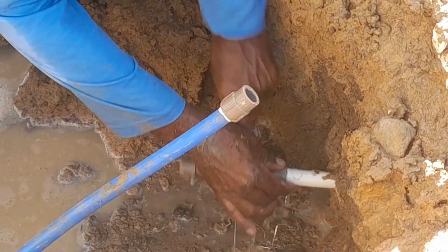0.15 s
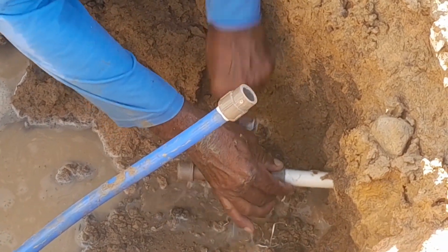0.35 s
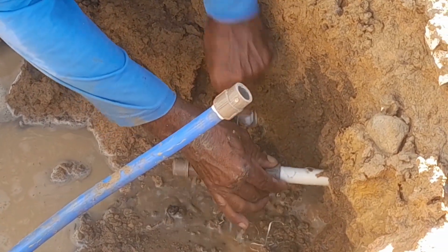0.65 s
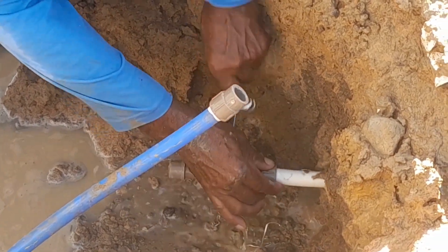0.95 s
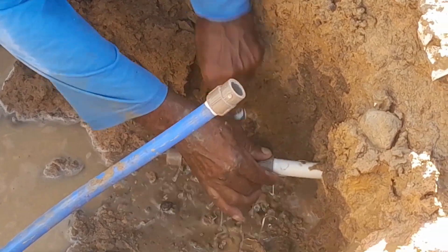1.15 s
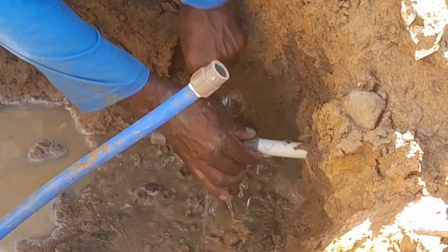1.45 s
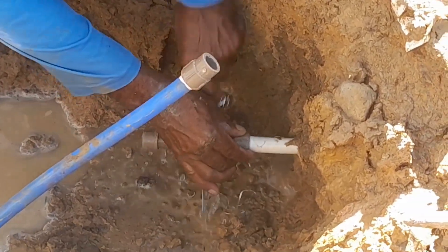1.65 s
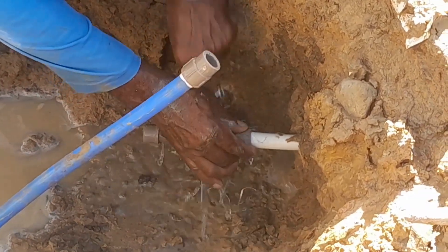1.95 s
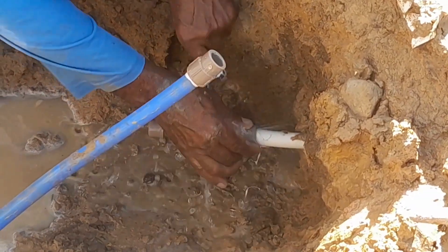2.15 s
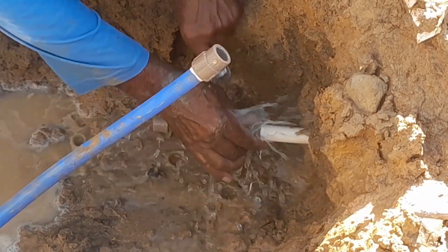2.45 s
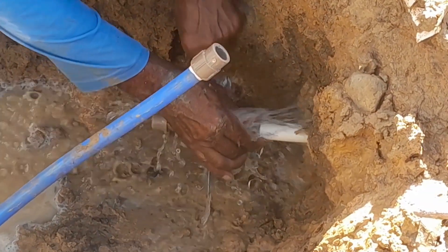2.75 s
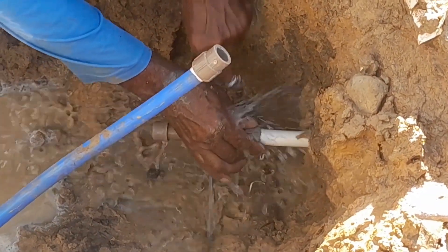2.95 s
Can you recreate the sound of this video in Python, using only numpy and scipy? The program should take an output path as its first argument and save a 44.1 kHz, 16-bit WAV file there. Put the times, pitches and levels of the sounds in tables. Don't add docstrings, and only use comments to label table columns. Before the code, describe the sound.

A hand saw rasps to and fro on a plastic pipe, close up in a muddy hole, a stroke every 0.16 seconds, with hollow ringing, gritty snags and knocks. It is strongest around 0.4-1.5 s, then softer, nearly gone by 2.9 s. Wind rumbles and pops on the left from 0.4 to 1.7 s, with brief puffs on the right. From about 1.9 s water hisses, spitting and growing after 2.3 s.

```python
import sys
import numpy as np
from scipy import signal
from scipy.fft import rfft, irfft
from scipy.io import wavfile
from scipy.ndimage import uniform_filter1d

SR = 44100
rng = np.random.default_rng(int(sys.argv[2]) if len(sys.argv) > 2 else 0)


def volts_from_decibels(level):
    exponent = np.asarray(level, float) / 20
    return 10 ** exponent


def wav_out(sig):
    wavfile.write(sys.argv[1], SR, np.round(np.clip(np.atleast_2d(sig).T, -1, 1) * 32767).astype(np.int16))


N = 136710
T = np.arange(N) / SR

# [Hz, dB]
LEFT_SHADE = [(300, 2.5), (700, -3.5), (1290, -3.5), (2380, -2), (4400, -1.5), (8120, -1.5), (12000, -0.5),
              (15000, -3)]


def unit(x):
    return x / np.sqrt(np.mean(x ** 2))


def noise():
    return rng.standard_normal(N)


def ring(x, hz, width_hz):
    b, a = signal.iirpeak(min(hz, .45 * SR), hz / max(width_hz, 5), SR)
    return signal.lfilter(b, a, x)


def colour(x, points, turn=((0, 0), (1, 0))):
    point_hz, point_db = np.array(points).T
    turn_hz, turn_rad = np.array(turn).T
    f = np.maximum(np.fft.rfftfreq(N, 1 / SR), 1)
    gain = volts_from_decibels(np.interp(np.log(f), np.log(point_hz), point_db, left=-70))
    return irfft(rfft(x) * gain * np.exp(1j * np.interp(f, turn_hz, turn_rad)), N)


def walk(rate):
    k = int(SR / rate)
    held = np.repeat(rng.standard_normal(N)[:N // k + 1], k)
    slewed = uniform_filter1d(uniform_filter1d(held, k), k)
    return unit(slewed[:N])


def curve(rows):
    return volts_from_decibels(np.interp(T, *np.array(rows).T))


def stroke(start, length, arch=0.44, fade_db=-3):
    bite_s, let_go_s = .002, .011
    travel = np.clip((T - start) / length, 0, 1)
    bite = np.clip((T - start) / bite_s, 0, 1)
    shape = bite * (1 - arch + arch * np.sin(np.pi * travel)) * volts_from_decibels(fade_db * travel)
    return shape * np.exp(-np.clip((T - start - length) / let_go_s, 0, 50))


def body(x, e, modes):
    patchy_db = 1.8
    steady_and_played = np.array([x, x * e])
    out = 0
    for k, (hz, width_hz, db) in enumerate(modes):
        swell = volts_from_decibels(db + patchy_db * walk(45.07))
        out = out + (-1) ** k * swell * ring(steady_and_played, hz, width_hz) / np.sqrt(width_hz)
    return out[1] / out[0].std()


def saw():
    # [s, s, dB, dB, Hz]
    pulls = [
        (-.01, 0.075, -40, -38, 479.7),
        (.318, 0.074, -28, -37, 481.1),
        (0.64, 0.052, -28, -36.5, 520),
        (0.964, 0.072, -29, -34.5, 481),
        (1.287, 0.051, -24.5, -32, 569.4),
        (1.612, 0.073, -38, -39, 560),
        (1.914, 0.055, -26, -41.5, 542.7),
        (2.253, 0.048, -37.5, -42, 520),
        (2.572, 0.067, -35.5, -40, 520),
        (2.94, 0.05, -58, -68, 393),
    ]
    # [s, s, dB, dB, dB]
    pushes = [(.03, 0.029, -55, -43, -42), (2.947, 0.046, -63, -66, -45), (0.168, 0.068, -34.5, -34, -47.5),
              (0.508, 0.035, -25, -28, -40.5), (0.837, 0.065, -31, -29.5, -41.5),
              (1.144, 0.064, -31.5, -28, -32.5), (1.458, 0.046, -27, -27, -39.5),
              (1.513, 0.021, -27, -28, -34), (1.779, 0.086, -33, -38, -39.5),
              (2.091, 0.031, -45.5, -41, -45), (2.117, 0.055, -34.5, -39, -39),
              (2.419, 0.091, -38.5, -41.5, -39.5), (2.745, 0.081, -35, -41.5, -35)]
    # [s, dB, dB, s]
    snags = [(0.09, -49.5, -35, 0.012), (.224, -39, -34.5, 0.019), (0.406, -40, -31, 0.01),
             (0.488, -26, -43, 0.0071), (0.559, -30.5, -30, 0.022), (0.581, -49, -64, 0.061),
             (0.71, -42.5, -33.5, 0.024), (0.811, -26.5, -31.5, 0.018), (0.836, -21.5, -26, 0.0092),
             (1.218, -31, -28.5, .016), (1.276, -30, -45, .0085), (1.354, -43, -41, 0.019),
             (1.611, -31, -61, 0.012), (1.771, -45.5, -70, .008), (1.83, -36, -63, 0.028),
             (2.831, -45.5, -47, .031)]
    # [Hz, Hz, dB]
    pipe_modes = [(490, 320, -5.5), (603.5, 26.6, 1.5), (695, 25, -2), (752, 122, -2), (971, 107, 3.5),
                  (1105, 58, 3), (1342, 29, 2.5), (1915, 36, -4.5)]
    # [Hz, Hz, dB per Hz]
    blade_rows = [(2318, 198, -3.5), (2980, 310, -9), (3570, 340, -11), (5460, 1160, -16),
                  (8500, 1020, -13.5), (12200, 10100, -26), (15500, 670, -21.5)]
    tooth_hz, tooth_jitter, tooth_scatter_db, chatter_db = 460, .35, 2.5, 1.2
    pull_gain_hz_per_s, pull_jitter, pull_thud_db = 4000, .075, -17
    thud_hz, thud_width_hz = 388, 283
    grit_share, rasp_apart = .6, .6

    pipe, rasp, thud = np.zeros(N), np.zeros(N), np.zeros(N)
    wobble = walk(500)
    rate = tooth_hz * np.exp(tooth_jitter * wobble)
    for start, length, pipe_db, rasp_db, thud_db in pushes:
        e = stroke(start, length)
        pipe += volts_from_decibels(pipe_db) * e
        rasp += volts_from_decibels(rasp_db) * e
        thud += volts_from_decibels(thud_db) * e
    for start, length, pipe_db, rasp_db, first_hz in pulls:
        e = stroke(start, length, arch=.6, fade_db=-2)
        pipe += volts_from_decibels(pipe_db) * e
        rasp += volts_from_decibels(rasp_db) * e
        thud += volts_from_decibels(pipe_db + pull_thud_db) * e
        quickening = first_hz + pull_gain_hz_per_s * np.minimum(T - start, length)
        rate = np.where(e > .01, quickening * np.exp(pull_jitter * wobble), rate)
    for start, pipe_db, rasp_db, length in snags:
        e = stroke(start, length) ** 2
        pipe += volts_from_decibels(pipe_db) * e
        rasp += volts_from_decibels(rasp_db) * e

    phase = np.cumsum(rate) / SR
    hits = np.diff(np.floor(phase), prepend=0)
    hits = hits * volts_from_decibels(tooth_scatter_db * noise() + chatter_db * walk(90))
    scrape = (0.46 + np.exp(-(phase % 1) / 0.68)) * volts_from_decibels(2.0 * walk(160))
    teeth = unit(hits - uniform_filter1d(hits, 200)) + grit_share * unit(noise() * scrape)

    steep = signal.butter(2, [350, 1500], "bandpass", fs=SR, output="sos")
    pipe_ring = 1.294 * signal.sosfilt(steep, body(teeth, pipe, pipe_modes))
    mud = thud * unit(ring(ring(teeth, thud_hz, thud_width_hz), thud_hz, thud_width_hz))
    blade_modes = [(hz, w, db + 10 * np.log10(w)) for hz, w, db in blade_rows]

    def blade():
        return body(noise() * scrape, rasp, blade_modes)

    shared = pipe_ring + np.sqrt(1 - rasp_apart) * blade() + mud
    return shared, np.sqrt(rasp_apart) * np.array([blade(), blade()])


def spray():
    # [Hz, dB per Hz]
    spray_colour = [(600, -8.5), (1500, -20), (2300, -8.5), (3300, -8.5), (5500, -7), (9200, -13.5),
                    (14900, -9), (16000, -9)]
    # [Hz, Hz, dB]
    hollow = [(1920, 180, -13.5), (2334, 67, -16.5), (5600, 2700, -36)]
    drops_per_s, drop_db, drop_scatter_db, flicker_db = 2500, -5, 4, 1.8
    landed = rng.random(N) < drops_per_s / SR
    drop_size = volts_from_decibels(drop_scatter_db * np.minimum(rng.exponential(size=N), 4))
    drops = landed * drop_size * np.sign(noise())
    source = noise() + volts_from_decibels(drop_db) * unit(drops)
    jet = 0
    for k, hz in enumerate(700 * 2 ** np.arange(0, 4.7, .3)):
        band = ring(ring(source, hz, hz / 3), hz, hz / 3)
        jet = jet + (-1) ** k * volts_from_decibels(flicker_db * walk(60)) * band
    hiss = unit(colour(jet, spray_colour))
    return unit(hiss + sum(volts_from_decibels(db) * unit(ring(jet, hz, w)) for hz, w, db in hollow))


def water_flow():
    # [s, dB]
    pressure = [(0, -50), (.3, -57), (.6, -52), (.8, -51), (1.1, -54), (1.4, -49), (1.75, -54.5),
                (1.9, -46.5), (2.1, -47.5), (2.3, -40), (2.5, -40.5), (2.54, -41), (2.65, -37),
                (2.9, -37.5), (3.1, -35.5)]
    surge_db = .8
    return curve(pressure) * volts_from_decibels(surge_db * walk(9.15))


def open_air():
    # [Hz, dB per Hz]
    air_colour = [(30, -37), (100, -10.5), (220, -14.5), (510, -5.5), (750, -14.5), (1350, -20.5),
                  (1600, -29), (2500, -49)]
    alike = unit(colour(noise(), air_colour + [(5000, -75)]))
    own = np.array([unit(colour(noise(), air_colour + [(5000, -60)])) for _ in range(2)])
    return volts_from_decibels(-57) * (alike + .5 * own)


def buffet():
    # [Hz, dB per Hz]
    gust_colour = [(15, -32), (25, -16.5), (54, 2), (82, 5.5), (184, -7.5), (246, -13.5), (436, -24.5),
                   (700, -31.5), (910, -45), (1540, -120)]
    buffet_db, buffet_per_s, skew, even_s = 3.5, 40, .16, 0.0525
    x = unit(colour(noise() * volts_from_decibels(buffet_db * walk(buffet_per_s)), gust_colour))
    x = x / np.sqrt(uniform_filter1d(x ** 2, int(even_s * SR)))
    return unit(x - skew * (x ** 2 - 1))


def puffs(rows):
    return sum(volts_from_decibels(db) * np.sin(np.pi * np.clip((T - s) / length, 0, 1)) ** 2 for s, length, db in rows)


def wind():
    # [s, dB]
    left_gust = [(0.25, -65.5), (0.43, -34.5), (0.62, -31.5), (0.78, -26.5), (0.9, -25), (1.06, -25.5),
                 (1.18, -24.5), (1.294, -25), (1.33, -33), (1.42, -24.5), (1.478, -21.5), (1.65, -54),
                 (1.69, -34.5), (1.72, -80)]
    # [s, s, dB]
    left_puffs = [
        (1.84, 0.052, -44),
        (2.14, 0.067, -63),
        (2.35, 0.083, -47.5),
        (2.43, 0.11, -49),
    ]
    # [s, s, dB]
    right_puffs = [(.72, 0.26, -40), (1.0, 0.39, -38), (1.37, 0.069, -31), (1.545, 0.059, -29),
                   (1.615, 0.029, -28.5), (1.665, 0.031, -23), (1.705, 0.042, -45), (1.8, .15, -39.5),
                   (1.96, 0.099, -42), (2.34, 0.091, -43), (2.42, 0.1, -47), (2.7, 0.23, -78)]
    # [s, dB]
    pop_rows = [(0.709, -23), (0.7774, -27), (0.8258, -26), (0.8417, -19.5), (0.8928, -21.5),
                (0.9172, -19.5), (0.9556, -20), (0.975, -16), (1.0008, -19.9), (1.0259, -17.5),
                (1.1067, -19), (1.1298, -24), (1.1755, -18), (1.2099, -17.5), (1.226, -20.5), (1.2508, -21),
                (1.2823, -14.5), (1.3036, -22.5), (1.3688, -15.5), (1.4166, -20.5), (1.4354, -21),
                (1.4507, -26), (1.4762, -17.5), (1.4997, -15.5)]
    pop_s = 0.0011
    left_level = 2 * curve([(.15, -58.5)] + left_gust + [(1.74, -90)]) + puffs(left_puffs)
    pops = 0
    for start, db in pop_rows:
        u = (T - start - pop_s) / pop_s
        pops = pops + 2 * volts_from_decibels(db) * (u ** 2 - 1) * np.exp(-u ** 2 / 2)
    left = left_level * buffet() + pops
    right_rumble = unit(colour(buffet(), [(20, -7.5), (130, -16.0), (300, -28)]))
    return np.array([left, (puffs(right_puffs) + volts_from_decibels(-57)) * right_rumble])


def catches():
    # [s, dB]
    knocks = [(0.182, -26), (0.231, -26.5), (0.331, -48), (0.371, -20), (.493, -23.5), (.513, -16),
              (.517, -14.5), (0.521, -31), (.567, -19), (.654, -28), (0.686, -26.5), (.818, -30),
              (.844, -16), (.857, -19), (1.005, -18), (1.027, -22), (1.151, -33), (1.307, -16.5),
              (1.312, -20), (1.461, -32), (1.487, -23.5), (1.518, -22), (1.862, -29), (1.922, -28),
              (2.121, -31), (2.559, -35), (2.76, -34), (2.786, -36), (2.945, -43)]
    knock_hz, decay_s, grit_db = 1110, 0.0017, -9
    grit = volts_from_decibels(grit_db) * unit(ring(noise(), 2100, 2200))
    out = 0
    for start, db in knocks:
        since = np.maximum(T - start, 0)
        tone = np.sin(2 * np.pi * knock_hz * since)
        out = out + volts_from_decibels(db) * (T > start) * np.exp(-since / decay_s) * (tone + grit)
    return out


def spits():
    # [s, dB, Hz, Hz]
    spit_rows = [(0.626, -36.5, 8500, 1000), (0.7874, -34.5, 10110, 8000), (2.1723, -40.5, 7080, 3000),
                 (2.223, -43, 14000, 5000), (2.2939, -40, 5600, 3010), (2.332, -34, 12800, 4000),
                 (2.3526, -38, 5130, 3000), (2.398, -40, 10760, 4985), (2.421, -35.5, 12100, 5980),
                 (2.5087, -36, 12100, 3000), (2.56, -30.5, 10510, 11950), (2.5671, -33.5, 5900, 8000),
                 (2.612, -32.5, 8460, 2990), (2.6903, -35, 14500, 4000), (2.7756, -41, 8400, 3995),
                 (2.808, -33, 13000, 8000), (2.9876, -37, 5127, 2500)]
    rise_s, decay_s = .0005, 0.0033
    x = noise()
    out = 0
    for start, db, hz, width_hz in spit_rows:
        since_peak = T - start - .001
        burst = np.exp(-np.abs(since_peak) / np.where(since_peak < 0, rise_s, decay_s))
        out = out + volts_from_decibels(db) * burst * unit(ring(x, hz, width_hz))
    return out


def ports(x, shade):
    # [s, dB, dB]
    echoes = [
        (.0011, -19, -20.5),
        (.0023, -12.5, -7.5),
        (.0041, -13.5, -11),
    ]
    # [Hz, radians]
    left_turn = [(0, 1), (1890, -0.76), (2580, 1.25), (4650, -3), (7400, -4.), (9000, -5), (16300, -13.5)]

    def late(s):
        return np.concatenate([np.zeros(int(s * SR)), x])[:N]

    left = x + sum(volts_from_decibels(left_db) * late(s) for s, left_db, right_db in echoes)
    right = x - sum(volts_from_decibels(right_db) * late(1.3 * s) for s, left_db, right_db in echoes)
    return np.array([colour(colour(left, shade), [(20, 0)] + LEFT_SHADE, left_turn), right])


def scene():
    # [Hz, dB]
    saw_rows = [(1500, -0.5), (2400, -4.5), (3400, -13.5), (5000, 4), (7400, 2), (8700, -13), (11500, 2),
                (15000, 3)]
    saw_shade = [(20, 0)] + saw_rows
    spray_apart = 0.76
    flow = water_flow()
    cut, rasps = saw()
    rasps = np.array([colour(rasps[0], saw_shade), rasps[1]])
    loose = rasps + np.array([spray(), spray()]) * flow * np.sqrt(spray_apart)
    loose = np.array([colour(loose[0], [(20, 0.028)] + LEFT_SHADE), loose[1]])
    sawing = ports(cut + catches(), saw_shade)
    shared_spray = ports(spray() * flow * np.sqrt(1 - spray_apart), [(20, 0), (SR, 0)])
    return sawing + spits() + shared_spray + loose + wind() + open_air()


def band_limit(x):
    return signal.sosfilt(signal.butter(12, 16200, fs=SR, output="sos"), x)


def record(dry):
    wet = signal.sosfilt(signal.butter(4, 38, "high", fs=SR, output="sos"), dry)
    wet = signal.sosfilt(signal.ellip(10, .2, 70, 15450, fs=SR, output="sos"), wet)
    return band_limit(wet)


dry = scene()
out = record(dry)
wav_out(out)
```